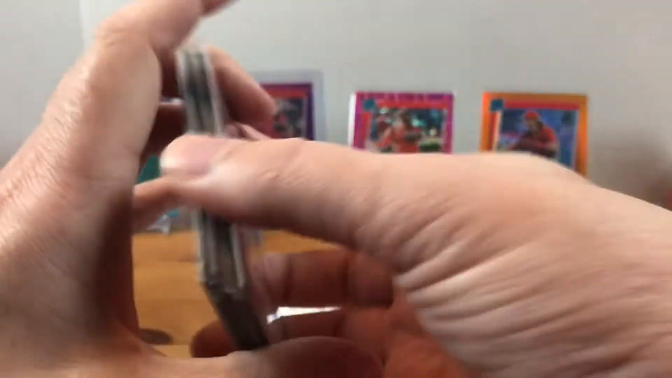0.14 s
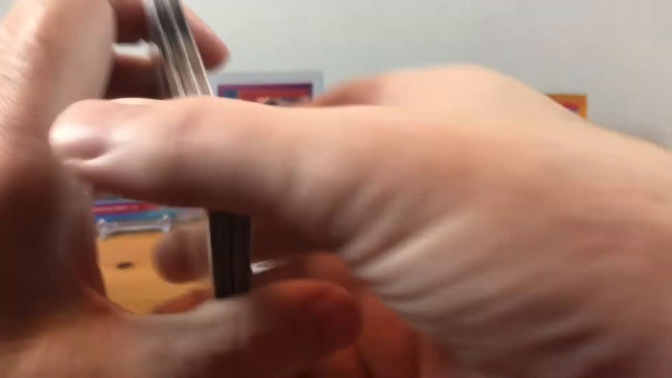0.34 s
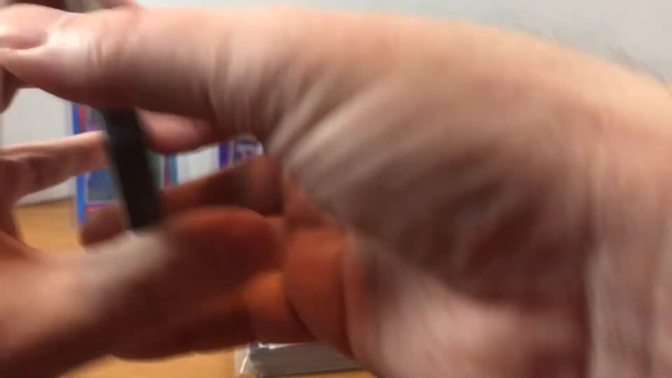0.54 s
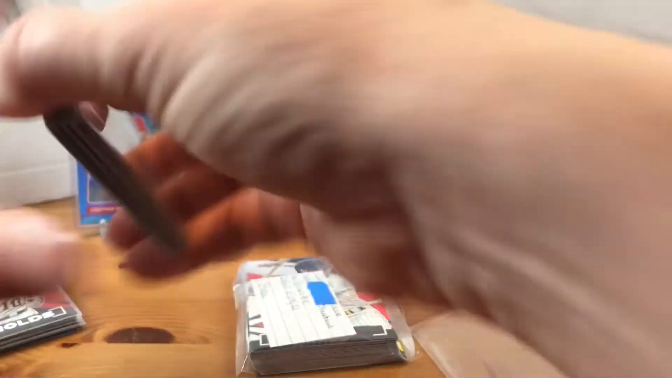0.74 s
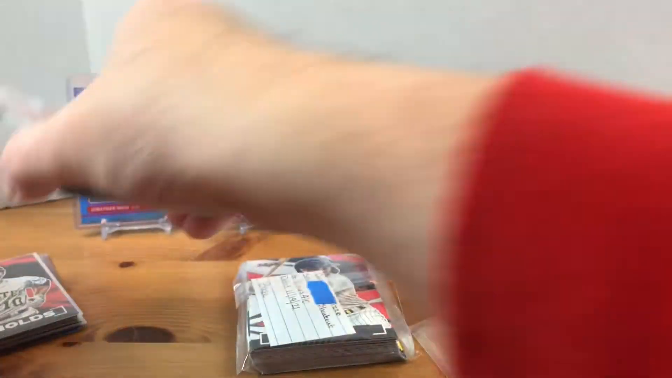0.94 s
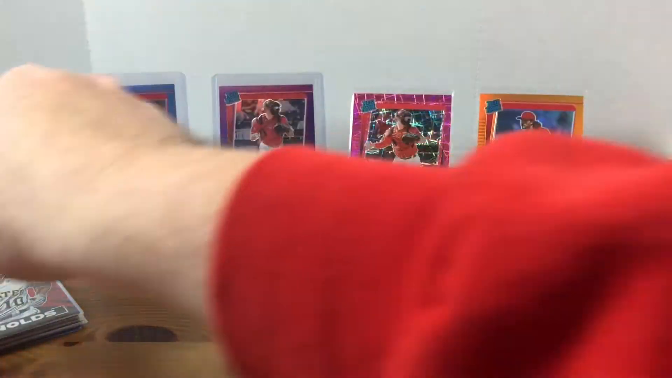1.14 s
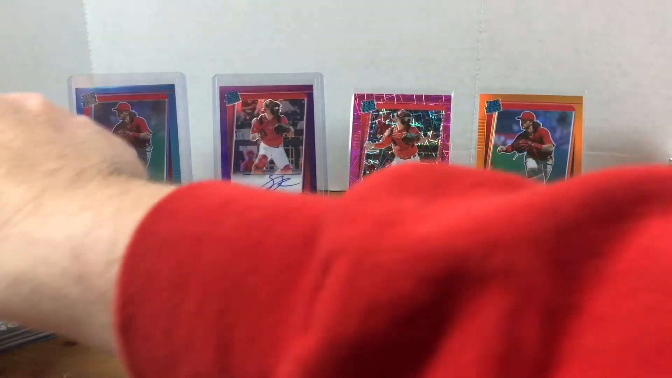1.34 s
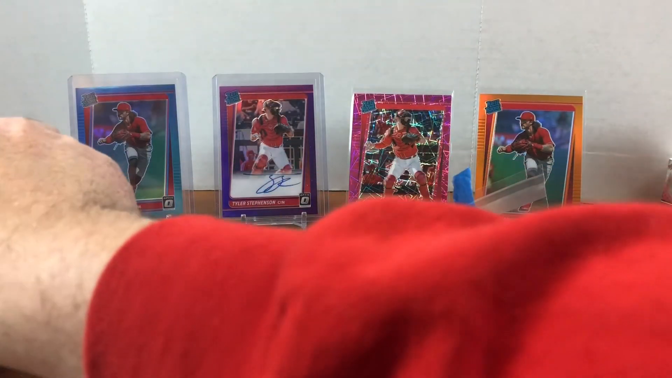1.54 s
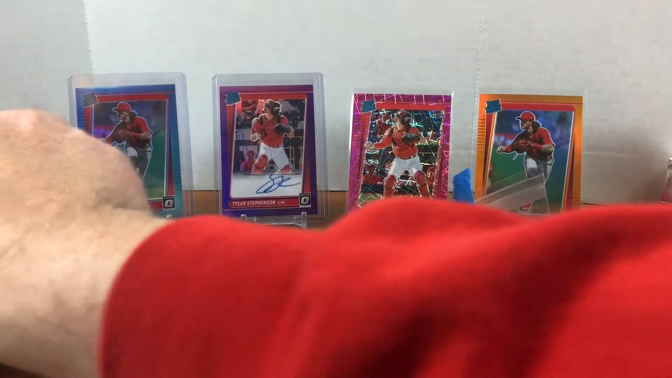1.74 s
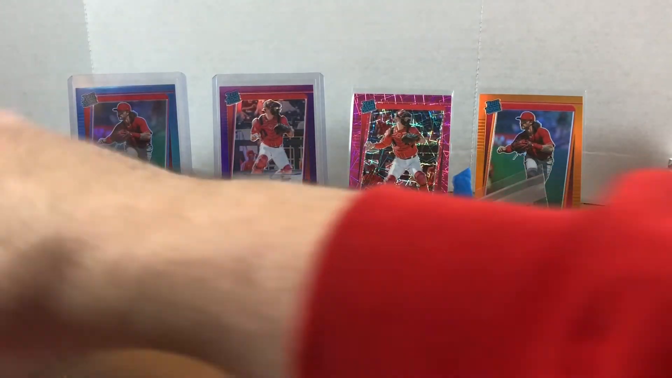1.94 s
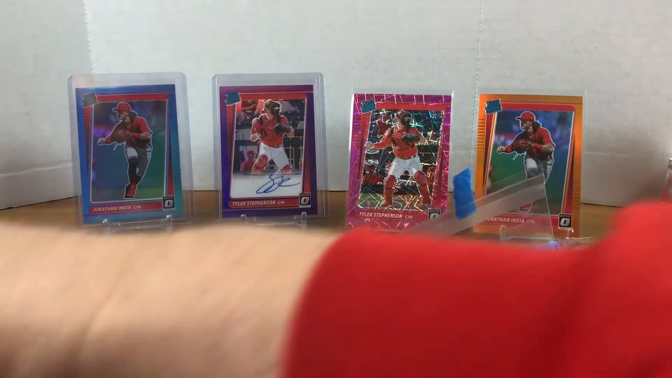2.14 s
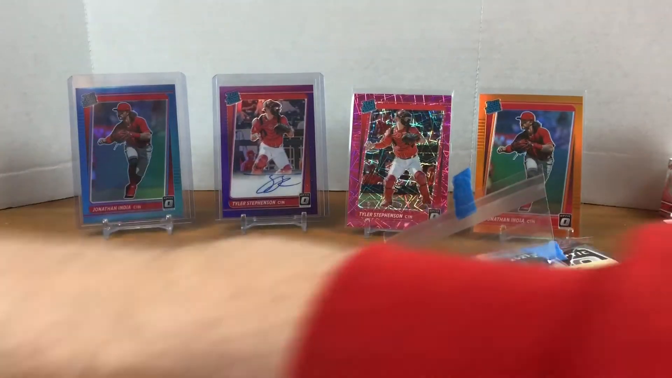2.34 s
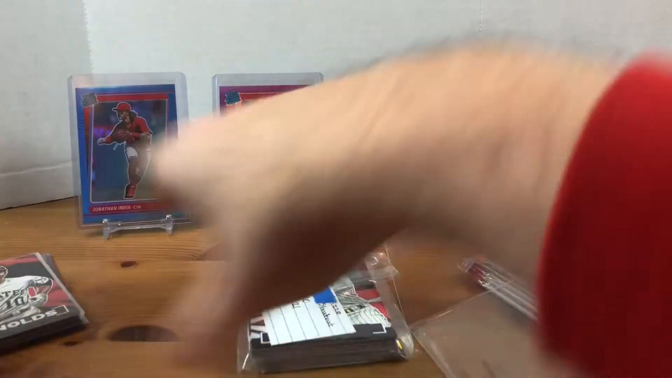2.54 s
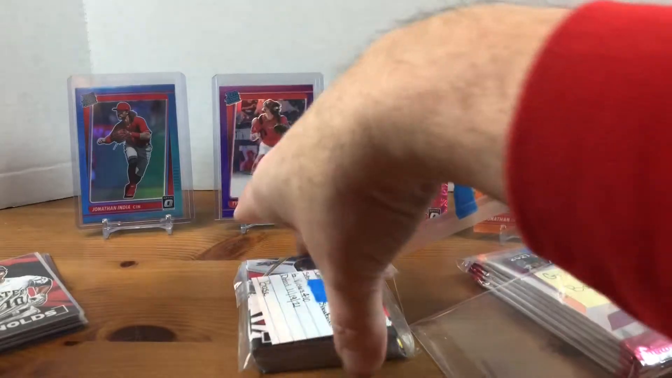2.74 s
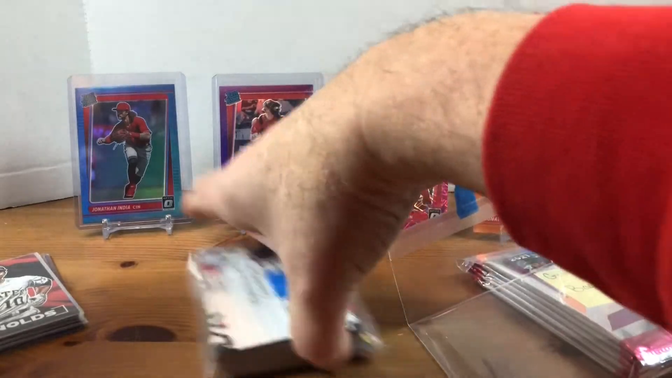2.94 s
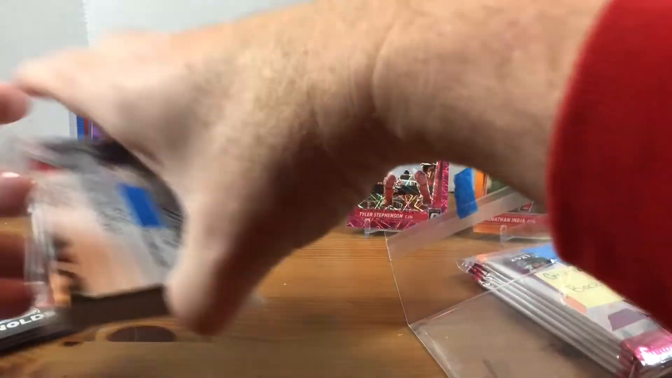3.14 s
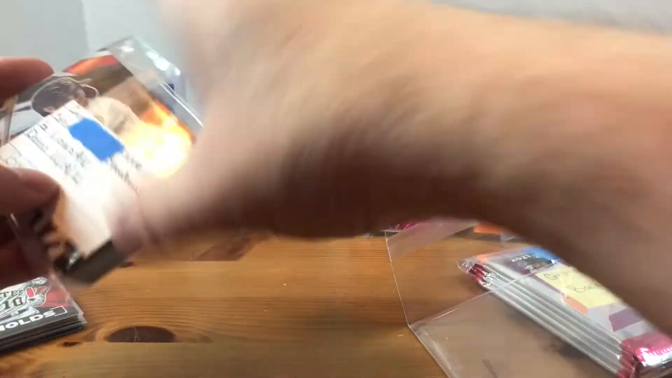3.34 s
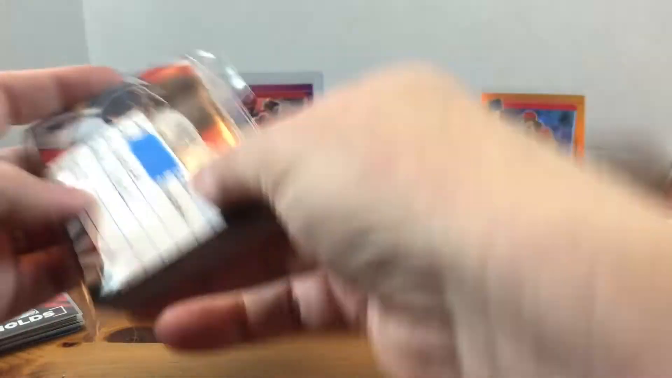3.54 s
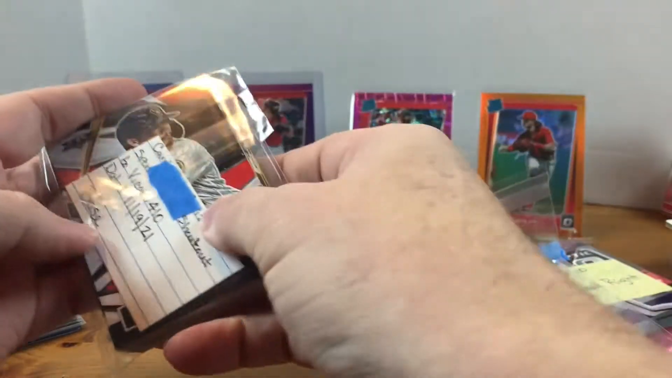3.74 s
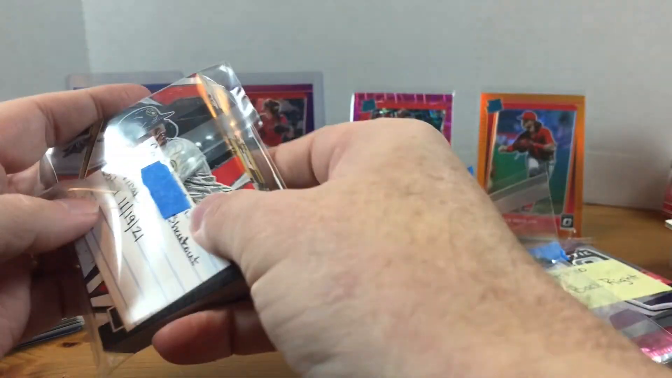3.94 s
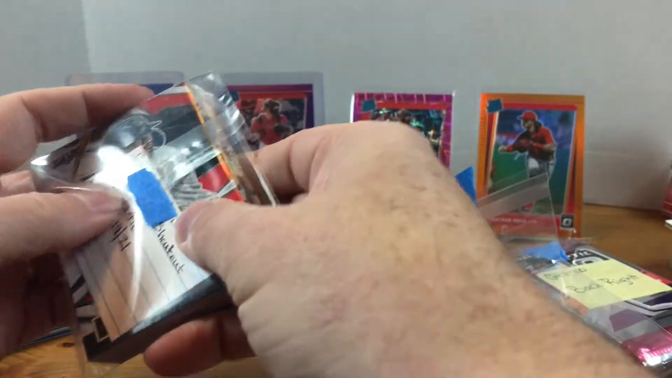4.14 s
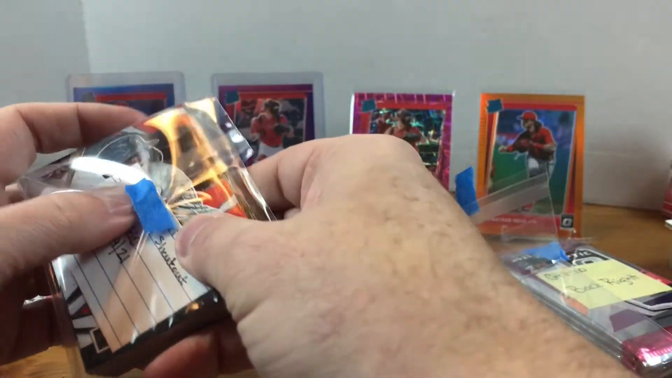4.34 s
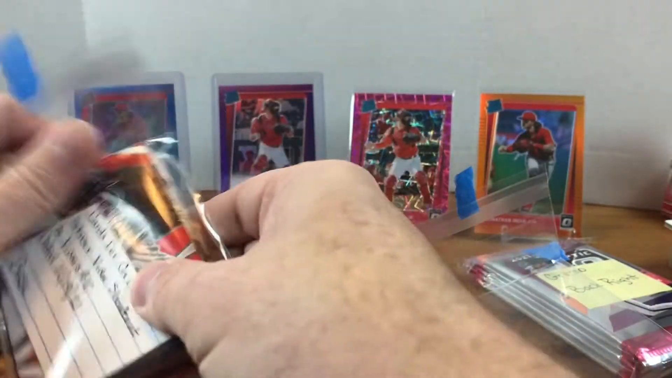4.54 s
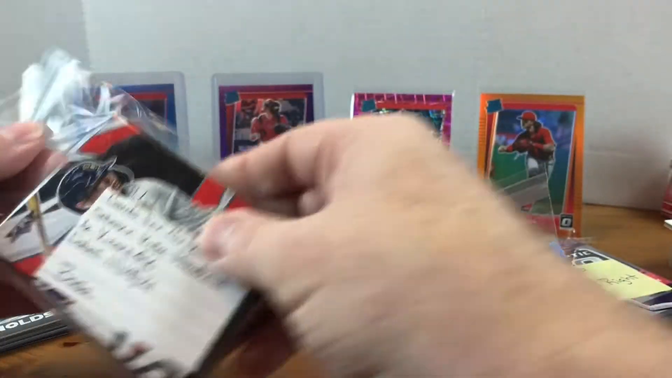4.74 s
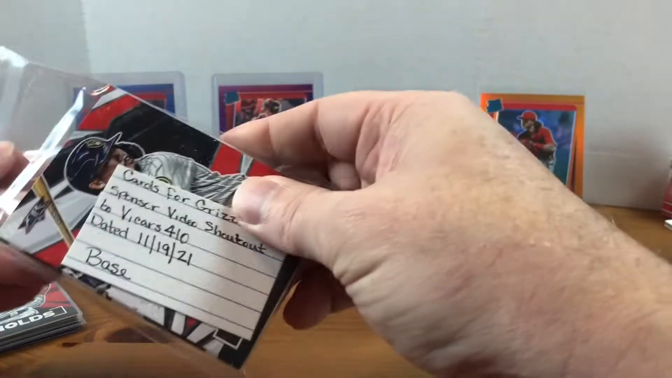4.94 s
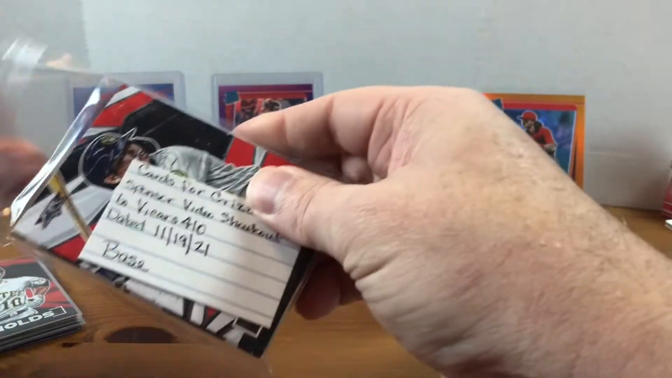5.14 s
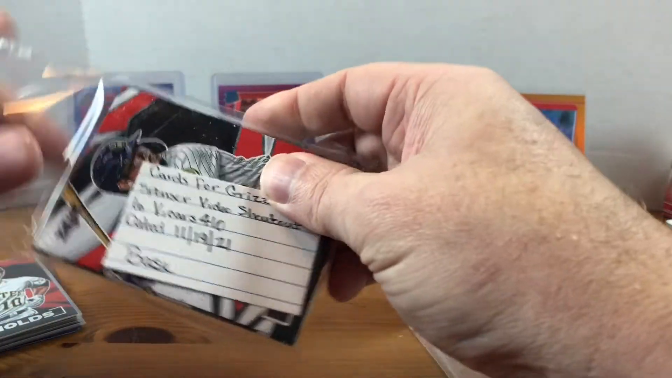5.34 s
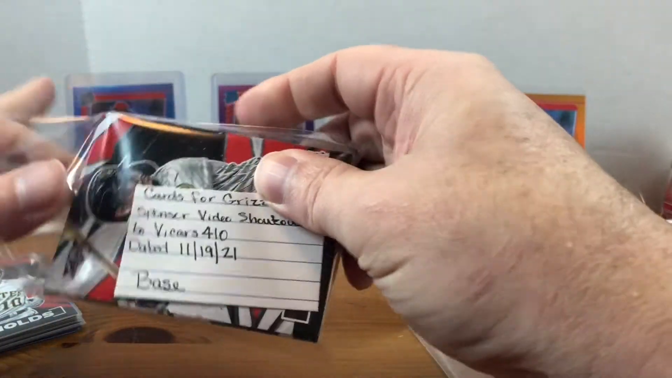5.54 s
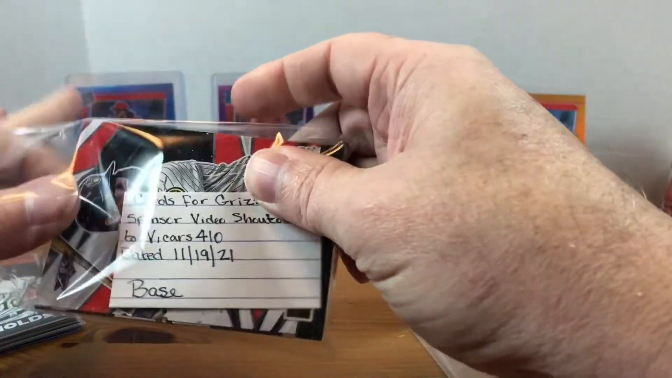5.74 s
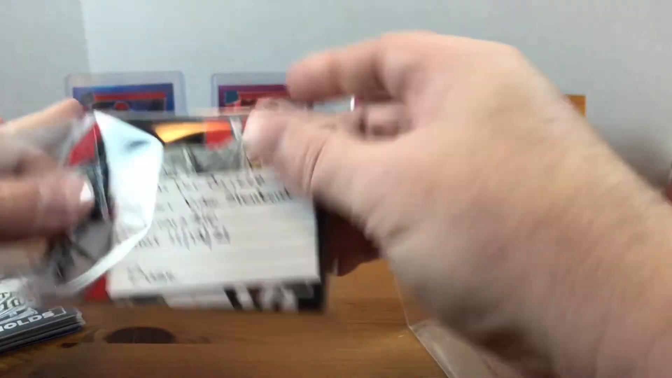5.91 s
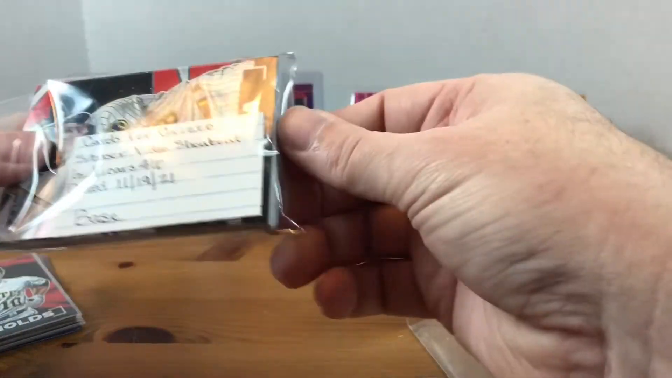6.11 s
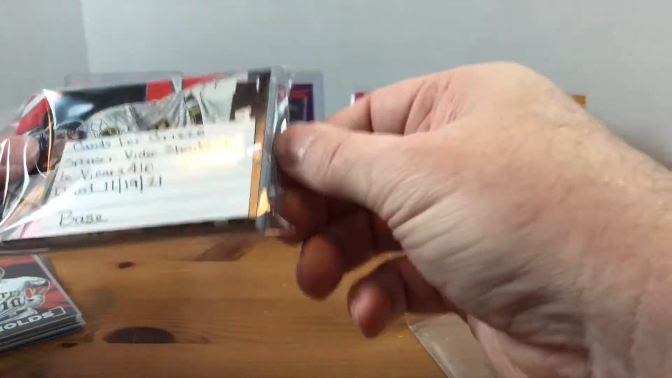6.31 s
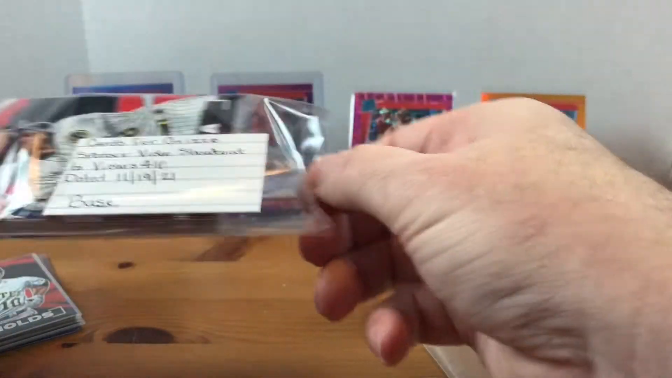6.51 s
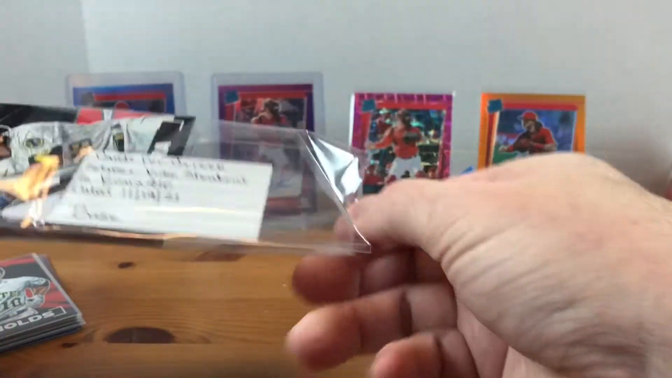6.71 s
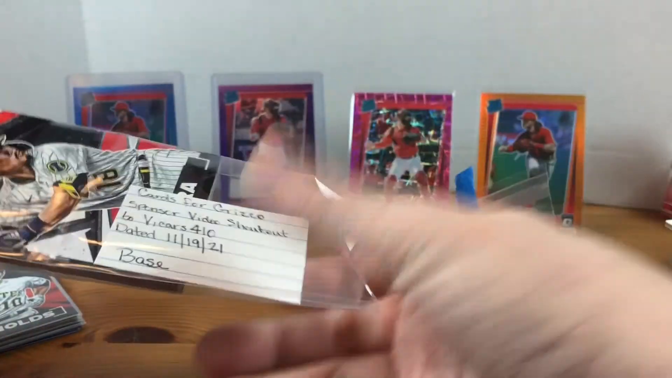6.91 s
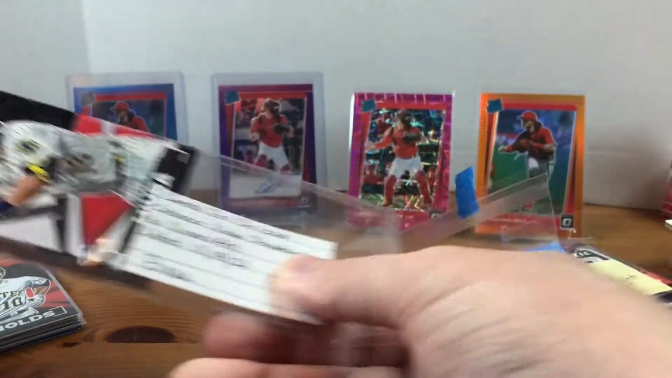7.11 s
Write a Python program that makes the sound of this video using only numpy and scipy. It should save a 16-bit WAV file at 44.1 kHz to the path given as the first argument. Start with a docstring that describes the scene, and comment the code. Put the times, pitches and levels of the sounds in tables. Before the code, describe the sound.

Quick dry card slides and light plastic ticks open the scene, followed by a gentle brushing swish and a quiet gap. One solid wooden desk knock stands out, then softer bumps and a short low scrape. Faint film rustling grows into sharp popping crinkles as a thin bag is pulled about, with dull thuds on the stack inside. Near microphone, short indoor room tail, faint steady air.

```python
"""First come crisp snaps and slides of sleeved trading cards, on a wooden desk close to the microphone, small room.
A soft, airy swish runs along the stack, it is knocked down on the desk, and a second one is dragged over the wood.
Its thin plastic bag is then pulled open and off: creases snap through one by one over a fine rustle.
Shaped random slips make the friction, short forces through filters the snaps, and desk resonances the blows.
Behind it all lie the room's short tail and its quiet air."""
import sys
import numpy as np
from scipy import signal
from scipy.fft import rfft, irfft, next_fast_len
from scipy.io import wavfile

SR = 44100
rng = np.random.default_rng(int(sys.argv[2]) if len(sys.argv) > 2 else 0)


def unload_wav(signal):
    """Save mono or channel-first audio to the path in sys.argv[1] as 16-bit WAV at rate SR, clipped to [-1, 1]."""
    wavfile.write(
        sys.argv[1],
        SR,
        np.round(np.clip(np.atleast_2d(signal).T, -1, 1) * 32767).astype(np.int16),
    )


N = 316228
TIME = np.arange(N) / SR
TAPS = 2048  # length of the filters, samples
BINS = np.fft.rfftfreq(TAPS, 1 / SR)  # Hz
EDGE_HZ = 16500  # upper band limit at the microphone


def amp(db):
    """Turns decibels into a linear gain."""
    return 10 ** (np.asarray(db) / 20)


def unit(x):
    """Scales to an rms of one."""
    return x / np.sqrt(np.mean(x ** 2) + 1e-20)


def burst(x, seconds):
    """Scales a short sound to the energy of a unit level held for so long."""
    return x * np.sqrt(seconds * SR / (np.sum(x ** 2) + 1e-20))


def read(points, hz):
    """Joins points by straight lines on a log-frequency axis."""
    f, value = np.transpose(points)
    return np.interp(np.log(hz + 1), np.log(f + 1), value)


def level(times, db):
    """A gain curve in dB over time, at -120 dB outside its span."""
    return amp(np.interp(TIME, times, db, left=-120, right=-120))


def add(mix, s, sound):
    """Lays a short sound into the mix from s seconds on."""
    part = mix[max(round(s * SR), 0):][:len(sound)]
    part += sound[:len(part)]


def causal(db):
    """The sharpest (minimum-phase) impulse response that has this spectrum."""
    log_gain = np.log(amp(np.r_[db, db[-2:0:-1]]) + 1e-5)
    return np.fft.ifft(np.exp(np.conj(signal.hilbert(log_gain)))).real


def colour(x, points):
    """Gives x a spectrum and an rms of one."""
    return unit(signal.oaconvolve(x, causal(read(points, BINS)))[:N])


def grains(per_s, spread_db, hiss):
    """Tiny slips of uneven size, at random moments, over a smooth hiss."""
    size = amp(spread_db * np.minimum(rng.exponential(1, N), 4))
    slips = size * rng.choice([-1, 1], N) * (rng.random(N) < per_s / SR)
    return unit(slips) + hiss * rng.standard_normal(N)


def stroke(start, length, attack_s, release_s):
    """Gain of one sliding movement: it speeds up, holds, and dies away as the fingers let go."""
    age = TIME - start
    return np.clip(age / attack_s, 0, 1) * np.exp(-np.maximum(age - length, 0) / release_s)


def crisp(force, evenness):
    """Evens out the spectrum of a short force, so that chance pitches stand out less."""
    z = rfft(force, 2 * len(force))
    size = abs(z) + .1 * np.mean(abs(z))
    return irfft(z / size ** np.clip(evenness, 0, 1))[:len(force)]


def bending(x, cycles, lowest_hz=120):
    """Bending waves run slower the lower they are, so the low pitches arrive later than the high ones."""
    size = next_fast_len(len(x) + SR // 2)
    lag = cycles * np.log1p(np.fft.rfftfreq(size, 1 / SR) / lowest_hz)
    return irfft(rfft(x, size) * np.exp(-2j * np.pi * lag), size)[:len(x)]


def patch(hz, below_db=13, above_db=7, peak_db=4):
    """Spectrum in dB of a patch of film: it rings at its own pitch and radiates poorly below it."""
    octaves = np.log2((BINS + 30) / hz)
    slopes = below_db * np.minimum(octaves, 0) - above_db * np.maximum(octaves, 0)
    return slopes + peak_db * np.exp(-(2 * octaves) ** 2)


# creases of a sleeve or the bag snapping through, close to the microphone:
# t/s, level/dB of the crack over 3 ms, f/Hz of the patch of film,
# push on the whole sheet/dB against that level, decay time of the crack/s
CREASE_SNAPS = [(0.0622, -38, 7500, -28, 0.0021), (0.0729, -43, 9100, -20, 0.001),
                (0.1053, -48, 8600, -1, 0.0044), (0.1579, -43.5, 6200, -15, 0.0017),
                (0.3508, -36.5, 9000, -11.5, 0.0013), (0.3565, -33.5, 4550, -18, 0.0024),
                (0.362, -36, 12500, -25, 0.00083), (0.6651, -42, 10700, -5, 0.0027),
                (1.9009, -60, 11900, -13, 0.00067), (1.9092, -60, 5900, -15, 0.0038),
                (1.9326, -59.5, 4900, -20, 0.0027), (2.0485, -62.5, 5600, -1.5, 0.0013),
                (2.8634, -40, 4600, -10, 0.0015), (3.1841, -45.5, 5550, -3, 0.0026),
                (3.2847, -47, 2000, -26.5, 0.0018), (3.5351, -44, 6500, 0.5, 0.0028),
                (3.8076, -45.5, 5000, -14, 0.00068), (4.1408, -40, 3200, -11, 0.00063),
                (4.1655, -24, 4700, -32, 0.00033), (4.1856, -36, 5900, -3, 0.00095),
                (4.1944, -24.0, 7640, -15, 0.0003), (4.2061, -14.5, 7500, -33, 0.00024),
                (4.2218, -18, 5760, -16, 0.00093), (4.3325, -33, 9300, -35, 0.0038),
                (4.3548, -15.5, 7100, -20, 0.0007), (4.3679, -12.5, 7860, -30, 0.00064),
                (4.3722, -13.5, 6200, -18, 0.00033), (4.3945, -31, 5400, -5, 0.0016),
                (4.5392, -28, 6400, -14, 0.0011), (4.5466, -32, 6700, -9, 0.0042),
                (4.5878, -40, 6200, -7, 0.0016), (4.6047, -42, 5100, -4, 0.00058),
                (4.617, -36.5, 4060, 7, 0.00068), (4.6323, -42.5, 4200, 3, 0.0019),
                (4.637, -33, 4900, -18, 0.0006), (4.651, -42.5, 2800, 2, 0.0004),
                (4.6616, -35.5, 6700, 7.5, 0.0009), (4.6714, -43, 3900, -28, 0.0004),
                (4.6737, -25.5, 2000, -16, 0.0043), (4.6871, -40, 2000, 2, 0.00051),
                (4.6893, -29, 3400, -6, 0.00093), (4.6987, -30, 4260, -29, 0.0004),
                (4.7119, -26, 3740, -17, 0.0027), (4.7207, -27, 4000, -12, 0.0014),
                (4.733, -23.5, 5600, -7, 0.0027), (4.741, -30, 4000, -26, 0.00092),
                (4.7431, -25.5, 9400, -7, 0.00034), (4.7517, -23.5, 6400, -15, 0.00026),
                (4.7536, -18.5, 11900, -5.5, 0.0042), (4.7564, -26, 6450, 1.5, 0.0028),
                (4.777, -29, 3700, -24, 0.0005), (4.7834, -30, 5100, -10, 0.0017),
                (4.7891, -25.5, 4020, -26, 0.00066), (4.794, -29, 4200, -21, 0.0011),
                (4.8242, -27.0, 4930, -32, 0.0019), (4.8454, -47, 5100, -21, 0.0013),
                (4.8783, -30.5, 6100, -0.5, 0.0021), (4.9267, -24, 3630, -35, 0.0011),
                (4.9351, -34.5, 7500, 1.5, 0.0028), (4.9435, -24, 5850, -9, 0.00079),
                (4.9542, -25.5, 11200, -4, 0.002), (5.0278, -24.5, 3900, -12, 0.0008),
                (5.0316, -28.5, 8900, 2, 0.0015), (5.1714, -42, 2100, -2, 0.00046),
                (5.1896, -33.0, 5130, -4, 0.0011), (5.2567, -25.5, 5900, -5.5, 0.0011),
                (5.291, -32.5, 2000, -0.5, 0.0037), (5.3398, -39.0, 2500, -10, 0.00083),
                (5.4115, -51, 2400, 12, 0.00085), (5.4326, -29.5, 2830, -10, 0.0027),
                (5.4579, -64, 4900, -2, 0.0014), (5.4808, -35, 7600, 5.5, 0.0034),
                (5.5059, -27.5, 5570, -14, 0.00072), (5.5131, -31.5, 3100, -15, 0.0014),
                (5.5295, -16, 6900, -3.5, 0.0026), (5.582, -25, 5400, -3.5, 0.0017),
                (5.5899, -31, 10400, -5, 0.0014), (5.6069, -16.5, 9900, -10, 0.0016),
                (5.6804, -51.5, 5640, 11, 0.0019), (5.7234, -22.5, 8150, -28, 0.00079),
                (5.7302, -30.5, 5100, -1.5, 0.0019), (5.7344, -28, 6500, -5.5, 0.002),
                (5.7482, -44, 2500, -14, 0.0016), (5.7644, -23.5, 3700, -22, 0.00045),
                (5.7699, -24, 8900, -6, 0.0016), (5.7768, -29, 6750, 1.5, 0.0014),
                (5.7911, -51, 5100, 11, 0.00074), (5.8215, -30.5, 5740, -0.5, 0.0028),
                (5.845, -29, 6800, -30, 0.0008), (5.8513, -19.5, 7200, -10.5, 0.00045),
                (5.8706, -30, 5900, -25, 0.00077), (5.8756, -25.5, 4740, -16, 0.0024),
                (5.91, -18.5, 6200, -16.5, 0.00034), (5.919, -24, 5900, -11.5, 0.0016),
                (5.935, -25.5, 8600, -20, 0.0009), (6.1395, -40, 2000, -28, 0.0019),
                (6.1846, -35.5, 6380, -2, 0.0005), (6.2703, -50, 2390, 9, 0.0027),
                (6.3506, -27.5, 3780, -11, 0.00047), (6.3974, -18, 9640, -15.5, 0.00039),
                (6.4286, -15, 4760, -7, 0.0014), (6.4748, -39, 2680, 6.5, 0.0011),
                (6.5131, -29, 4000, -23, 0.0012), (6.5898, -28, 5500, -19, 0.001),
                (6.6037, -26, 5950, -29, 0.0027), (6.6685, -34, 3280, -13, 0.0014),
                (6.7361, -27.5, 3900, -18, 0.00075), (6.7517, -31.5, 3900, -7, 0.0018),
                (6.7607, -31.5, 2120, -28, 0.0041), (6.8437, -35, 3520, -10, 0.00064),
                (6.9505, -22.0, 6500, -8.5, 0.00044), (6.9713, -13.5, 4350, -16.5, 0.0014),
                (6.9832, -28.5, 6200, 2, 0.00095), (7.1247, -17, 6850, -22, 0.00042)]
# colour of the whole sheet when pushed: f/Hz, relative level/dB per Hz
SHEET_COLOUR = [(100, -28.5), (400, -9.5), (700, -3.5), (920, 3.5), (1300, -5.5), (2000, -3), (2750, 2.5),
                (3400, -6), (8000, -24)]
# a weak shiver dying away after the snap: level against the crack, decay time
SHIVER_DB, SHIVER_S = -22, .003
# the facet beside each crease rings at a pitch scattered about FACET_HZ
FACET_HZ, FACET_OCTAVES, FACET_DB, FACET_Q = 3000, .7, 6, 5


def snaps(rows, onset_db=-26, onset_s=0.0007, jump=2.08, evenness=0.22, lag_cycles=.6,
          ring_db=0.5, ring_hz=3400, ring_width_hz=1800):
    """A crease snaps through within milliseconds, its onset swelling very briefly; film and sheet radiate it."""
    out = np.zeros(N)
    t = np.arange(-128, 512) / SR  # the snap is at zero
    chances = rng.standard_normal((len(rows), len(t)))
    for (s, db, hz, push_db, decay_s), chance in zip(rows, chances):
        onset = amp(onset_db) * np.exp(-abs(t) / onset_s)
        decay = np.exp(-abs(t) / max(decay_s, 1 / SR))
        shiver = amp(SHIVER_DB) * np.exp(-abs(t) / SHIVER_S)
        envelope = np.where(t < 0, onset, decay + shiver)
        force = crisp(chance * envelope + jump * (t == 0), evenness)
        # the free span of film differs each time
        shifted = BINS * 2 ** (.1 * chance[0])
        bag_ring = ring_db / (1 + (2 * (shifted - ring_hz) / ring_width_hz) ** 2)
        facet_hz = FACET_HZ * 2 ** (FACET_OCTAVES * chance[1])
        facet_ring = FACET_DB / (1 + (2 * FACET_Q * (BINS / facet_hz - 1)) ** 2)
        film_db = patch(hz, below_db=11.5, above_db=7.5, peak_db=-1)
        crack = unit(amp(film_db + bag_ring + facet_ring))
        push = amp(push_db) * unit(amp(read(SHEET_COLOUR, shifted)))
        power = crack ** 2 + push ** 2
        sound = signal.fftconvolve(force, causal(10 * np.log10(power)))
        add(out, s + t[0], amp(db) * burst(sound, .003 * power.mean()))
    return bending(out, lag_cycles)


# how hard the bag is handled between the rubs: t/s, relative rustle level/dB
BAG_HANDLING = [(2.92, -72), (3.13, -66), (3.2, -76), (3.42, -58), (3.63, -65), (3.861, -84), (4.01, -70),
                (4.2, -75), (4.331, -56.5), (4.82, -48.5), (4.96, -47.5), (5.24, -59.5), (5.39, -47),
                (5.761, -59.5), (6.19, -66), (6.388, -62), (6.51, -51), (6.56, -59.5), (6.86, -52.5),
                (7.17, -61)]
# small creases: highest rate, loudest level against the handling and the range below it
SMALL_PER_S, SMALL_DB, SMALL_RANGE_DB = 8.7, 7.5, 8
# their lowest pitch and its spread upwards, push on the sheet and decay time
SMALL_HZ, SMALL_OCTAVES, SMALL_PUSH_DB, SMALL_DECAY_S = 3000, 1.8, -8, .0006
# from this handling level up they come at the full rate
SMALL_BUSY_DB = -49


def small_snaps(count=300):
    """Rows for creases that give way by chance: harder handling makes them louder and more frequent."""
    s, db = np.transpose(BAG_HANDLING)
    wait, size, pitch, luck = rng.random((count, 4)).T
    times = s[0] + np.cumsum(-np.log(1 - wait)) / SMALL_PER_S
    effort_db = np.interp(times, s, db)
    snap_db = effort_db + SMALL_DB - SMALL_RANGE_DB * size
    snap_hz = SMALL_HZ * 2 ** (SMALL_OCTAVES * pitch)
    rows = np.c_[times, snap_db, snap_hz, np.full((count, 2), [SMALL_PUSH_DB, SMALL_DECAY_S])]
    happens = (times < s[-1]) & (luck < amp(effort_db - SMALL_BUSY_DB))
    return list(rows[happens])


# the film catches and lets go: level points per second, and their spread
CLUMPS_PER_S, CLUMP_DB = 130, 3.7


def clumps():
    """The rustle comes in clumps: a quick random flutter of level with an rms of one."""
    knots = np.arange(0, TIME[-1] + 1, 1 / CLUMPS_PER_S)
    return unit(amp(CLUMP_DB * np.interp(TIME, knots, rng.standard_normal(len(knots)))))


# a finger rubbing over the bag: start t/s, length/s, relative friction level/dB,
# relative sounding of the stack inside/dB against that friction
BAG_RUBS = [(2.69, 0.051, -58.5, 5.5), (2.75, 0.16, -65.5, -1.5), (3.139, 0.15, -59.5, -3),
            (3.489, 0.052, -54.5, -12), (3.766, 0.17, -57.5, -8.5), (4.007, 0.1, -60.5, -9),
            (4.131, 0.085, -48, -14), (4.358, 0.028, -36.5, -10), (4.403, 0.12, -56, -20),
            (4.519, 0.028, -47, 2.5), (4.729, 0.045, -41, -12), (4.816, 0.029, -46.5, -26),
            (4.927, 0.009, -44.5, 1.5), (5.179, 0.055, -53, 2), (5.494, 0.087, -51, -2.5),
            (5.702, 0.043, -48.5, 3.5), (5.834, 0.031, -43, -5), (6.043, 0.0062, -50, -1),
            (6.086, 0.017, -47.5, -5), (6.369, 0.16, -44, -3.5), (6.543, 0.087, -44.5, -2),
            (6.65, 0.049, -44, -11.5), (6.831, 0.06, -53.5, 1), (6.935, 0.039, -44, 6),
            (7.032, 0.23, -36, -14)]
# a rub swells over this share of its length, holds, then dies away
RUB_ATTACK_SHARE, RUB_RELEASE_S = 0.55, 0.02
# colour of the rustling film: f/Hz, relative level/dB per Hz
FILM_COLOUR = [(300, -53.5), (1200, 1), (2400, -15.5), (3700, -2), (5200, 0), (7500, -2), (10500, -4.5),
               (13000, -11.5), (16000, -24.5)]
# colour of the stack inside the bag: f/Hz, relative level/dB per Hz
STACK_COLOUR = [(30, -5), (60, -3), (110, -1.5), (200, 2), (450, -6), (720, -1.5), (1150, 1.5), (1600, -1),
                (2600, -5), (4500, -22.5), (12000, -60.5)]
WRINKLE_SPREAD_DB = 9  # unevenness of the wrinkle pops


def bag(rub_db=3.5, stack_db=1, crackle_db=-3, held_stack_db=-6, held_hz=7000):
    """Film sticks, slips and pops in tiny wrinkles, duller when merely held, and sounds through the stack."""
    held = level(*np.transpose(BAG_HANDLING))
    friction = 0
    body = amp(held_stack_db) * held
    for s, length, db, body_db in BAG_RUBS:
        rub = amp(db) * stroke(s, length, RUB_ATTACK_SHARE * length, RUB_RELEASE_S)
        friction = friction + amp(rub_db) * rub
        body = body + amp(body_db + stack_db) * rub
    slips = grains(per_s=3000, spread_db=-1.5, hiss=1.0)
    wrinkles = np.zeros(N)
    for hz in np.geomspace(1800, 12000, 8):
        pops = grains(per_s=600, spread_db=WRINKLE_SPREAD_DB, hiss=0)
        wrinkles += signal.oaconvolve(pops, causal(patch(hz, peak_db=-7.0)))[:N]
    film = unit(colour(slips, FILM_COLOUR) + amp(crackle_db) * unit(wrinkles)) * clumps()
    dull = signal.lfilter(*signal.butter(1, min(held_hz, EDGE_HZ), fs=SR), film)
    inside = colour(slips, STACK_COLOUR) * clumps()
    return friction * film + held * dull + body * inside


# resonances of the bag and the hands around it: f/Hz, width/Hz, relative boost/dB
BAG_RESONANCES = [(540, 210, 9), (942, 86, 9), (2000, 140, 9.5), (2447, 290, 5), (3470, 310, 11),
                  (13990, 8400, 7.5)]
# as the bag is flexed its resonances drift by about this much, this often
DRIFT_OCTAVES, DRIFT_PER_S = .16, 14


def cupped(x, overall_db=-2):
    """The bag and the hands around it lend the rustle their resonances, which drift as the bag is flexed."""
    hz, t, z = signal.stft(x, SR, nperseg=256)
    knots = np.arange(0, t[-1] + 1, 1 / DRIFT_PER_S)
    drift = DRIFT_OCTAVES * np.interp(t, knots, rng.standard_normal(len(knots)))
    shifted = hz[:, None] * 2 ** drift
    gain_db = sum(db / (1 + (2 * (shifted - centre) / width) ** 2) for centre, width, db in BAG_RESONANCES)
    return signal.istft(z * amp(gain_db + overall_db), SR, nperseg=256)[1][:N]


# sleeved cards sliding over each other near the microphone:
# start t/s, length/s, friction level/dB, tilt towards the treble/dB per octave
CARD_SLIDES = [(-0.01, .05, -43.5, 1), (0.11, 0.039, -47.5, 0), (0.258, 0.084, -44, 1.5),
               (0.504, 0.026, -46.5, 1.5), (0.532, 0.034, -56, 1), (0.644, 0.034, -49.5, -1),
               (1.036, 0.046, -60.5, -0.5), (2.161, 0.025, -63.5, -3.5), (2.191, 0.07, -44.5, -2)]
# colour of the sleeves before the tilt: f/Hz, relative level/dB per Hz
SLEEVE_COLOUR = [(30, -10), (55, 1), (110, -8.5), (300, -16), (620, -11), (1200, -11), (1600, -6),
                 (3300, -5.5), (4400, -6.5), (9000, -2), (13300, -4), (16000, -9.5)]
# a slide swells over, and later dies away by, these shares of its length
SLIDE_ATTACK_SHARE, SLIDE_RELEASE_SHARE = 0.37, 0.13


def cards():
    """Smooth sleeves hiss as they slide; a longer stroke starts and dies away more gently."""
    slips = grains(per_s=3300, spread_db=3, hiss=1.1)
    out = np.zeros(N)
    for s, length, db, tilt in CARD_SLIDES:
        hiss = colour(slips, [(hz, gain + tilt * np.log2(hz)) for hz, gain in SLEEVE_COLOUR])
        movement = stroke(s, length, SLIDE_ATTACK_SHARE * length, SLIDE_RELEASE_SHARE * length)
        out += amp(db) * movement * hiss
    return out


# the soft swish along the stack: t/s, relative level/dB
SWISH_LEVEL = [(0.361, -61), (0.6, -59.5), (0.8, -56), (0.91, -55), (0.98, -67), (1.2, -67.5), (1.35, -74)]
# colour of the swish: f/Hz, relative level/dB per Hz
SWISH_COLOUR = [(50, -17), (150, -3.5), (330, -15.5), (550, -8.5), (900, -17.5), (1350, -12.5), (2600, -18),
                (3500, -17), (5000, -19.5), (11800, -25), (16000, -26)]


def swish(ring_db=4, ring_hz=3900, sink_hz_per_s=1500, ring_width_hz=500):
    """A soft, airy swish of coloured random grains, with a faint ring that sinks in pitch."""
    brushing = colour(grains(per_s=6600, spread_db=3.5, hiss=0.77), SWISH_COLOUR)
    hz, t, z = signal.stft(brushing, SR, nperseg=512)
    # the sinking ring is at ring_hz at the time of the second level point
    centre = ring_hz - sink_hz_per_s * (t - SWISH_LEVEL[1][0])
    ring = ring_db / (1 + (2 * (hz[:, None] - centre) / ring_width_hz) ** 2)
    ringing = signal.istft(z * amp(ring), SR, nperseg=512)[1][:N]
    return level(*np.transpose(SWISH_LEVEL)) * ringing


# resonances of the desk top with the stack on it: f/Hz, width/Hz, relative level/dB
DESK_RESONANCES = [(118, 10, -23.5), (183, 40, -7.5), (236, 31, -2.5), (334, 60, -7), (430, 60, 1),
                   (555, 80, -2), (650, 79, -4), (880, 78, -5.5), (970, 110, -9.5), (1170, 67, -1.5),
                   (1260, 300, 0), (1370, 120, -4), (1530, 80, -13.5), (1760, 220, -16), (2260, 490, -12),
                   (2820, 150, -11.5)]


def desk(corner_hz, lowest_hz=170):
    """Impulse response of the desk to a blow; a soft blow reaches only its low modes."""
    power = sum(amp(db) ** 2 / (1 + (2 * (BINS - hz) / width) ** 2) for hz, width, db in DESK_RESONANCES)
    radiation = 1 / (1 + (lowest_hz / (BINS + 1)) ** 4)  # weak in the deep bass
    blow = 1 / (1 + (BINS / corner_hz) ** 2) ** 2
    return causal(10 * np.log10(power * radiation * blow / power.max()))


# stacks and fingers knocking the desk:
# t/s, level/dB of the desk's ring over 10 ms, hardness as the corner of the blow f/Hz
DESK_KNOCKS = [(1.188, -58.5, 400), (2.1978, -33.5, 320), (2.2498, -10.5, 2604), (2.6585, -46.5, 2490),
               (2.663, -36.5, 150), (2.709, -53, 1500), (2.77, -48, 150), (2.824, -60, 295)]
# colour of a card edge striking: f/Hz, relative level/dB per Hz
CLACK_COLOUR = [(100, -26.5), (600, -14), (1500, -16), (3000, 8), (5000, 4.5), (9000, 0.5), (16000, -16.5)]


def bumps(clack_db=-12, clack_s=0.0023, chatter_db=-9, chatter_s=0.0072, evenness=.8, lag_cycles=1.4):
    """Blows ring the desk; the cards of the stack chatter after them, and hard edges clack."""
    out = np.zeros(N)
    t = np.arange(TAPS) / SR
    chances = rng.standard_normal((len(DESK_KNOCKS), 2, TAPS))
    for (s, db, hz), (chatter_noise, clack_noise) in zip(DESK_KNOCKS, chances):
        chatter = crisp(chatter_noise * np.exp(-t / chatter_s), evenness)
        force = (t == 0) + amp(chatter_db) * chatter / np.linalg.norm(chatter)
        ring = burst(signal.fftconvolve(force, desk(hz)), .01)
        edge = crisp(clack_noise * np.exp(-t / clack_s), evenness)
        clack = burst(signal.fftconvolve(edge, causal(read(CLACK_COLOUR, BINS))), .01)
        clack_gain = amp(clack_db) * hz / (hz + 1000)  # harder blows clack more
        add(out, s, amp(db) * (ring + clack_gain * clack))
    return bending(out, lag_cycles)


# fingers and edges thudding on a stack: t/s, level/dB over 10 ms, f/Hz
STACK_THUDS = [(0.47, -54.5, 480), (2.659, -54, 2050), (2.704, -52, 1700), (2.712, -44, 1360),
               (2.717, -60, 1890), (3.542, -53.5, 150), (4.548, -39.5, 364), (4.755, -31.5, 520),
               (4.833, -43.5, 310), (4.881, -44.5, 330), (5.483, -39, 345), (6.058, -49, 910),
               (5.919, -44.5, 385), (6.412, -46, 430), (6.429, -47, 464), (6.464, -41.5, 230),
               (6.749, -46.5, 256.5), (6.972, -29, 880), (7.124, -36.5, 890)]


def thuds(lag_cycles=1.2):
    """A finger landing on a stack gives a dull, well damped note that falls in pitch."""
    out = np.zeros(N)
    for s, db, hz in STACK_THUDS:
        note = burst(causal(patch(hz, below_db=9, above_db=11, peak_db=5)), .01)
        add(out, s, amp(db) * note)
    return bending(out, lag_cycles)


# the second stack scraping over the desk: t/s, level/dB
DESK_DRAG = [(2.661, -59), (2.74, -53), (2.80, -55), (2.84, -52), (2.87, -69.5), (2.9, -50), (2.93, -76)]


def drag(corner_hz=170):
    """The stack judders over the wood and keeps the desk's low modes ringing."""
    judder = grains(per_s=60, spread_db=5.0, hiss=1.0)
    ringing = unit(signal.oaconvolve(judder, desk(corner_hz))[:N])
    return level(*np.transpose(DESK_DRAG)) * ringing


# the small room's tail: f/Hz, t60/s, relative strength/dB
ROOM_BANDS = [(150, 0.68, 1.5), (400, 0.25, 1), (1200, 0.27, -3), (3500, 0.25, 0.5), (8960, 0.23, -6.5),
              (15650, 0.14, 9)]


def room(x, wet_db=-14, near_db=-16, near_s=0.0012, rise_s=0.01):
    """Quick reflections from desk and hands, then the short tail of the room, its bands fading separately."""
    t = np.arange(SR // 2) / SR
    near, late = rng.standard_normal((2, len(t)))
    # sparse reflections, none sooner than 1.2 ms
    near = near * (rng.random(len(t)) < .1) * (t > .0012) * np.exp(-t / near_s)
    hz, age, z = signal.stft(late, SR, nperseg=256)
    bands = np.array(ROOM_BANDS)
    strength_db = read(bands[:, ::2], hz)[:, None]
    t60 = read(bands[:, :2], hz)[:, None]
    fade_db = strength_db - 60 * age / t60
    tail = signal.istft(z * amp(fade_db), SR, nperseg=256)[1][:len(t)]
    tail = tail * (1 - np.exp(-(t / rise_s) ** 2))
    echo = amp(wet_db) * tail / np.linalg.norm(tail) + amp(near_db) * near / np.linalg.norm(near)
    return x + signal.fftconvolve(x, echo)[:N]


# colour of the quiet air: f/Hz, relative level/dB per Hz
AIR_COLOUR = [(12, -45), (20, -20), (68, -8), (277, -14), (310, -10.5), (357, -15.5), (1440, -26),
              (5530, -32.5), (16000, -35.5)]


def quiet_air(air_db=-70):
    """The steady background: noise given the colour of the room's air."""
    return amp(air_db) * colour(rng.standard_normal(N), AIR_COLOUR)


def scene():
    """The handling in the room, over its quiet air."""
    film = cupped(bag()) + snaps(list(CREASE_SNAPS) + small_snaps())
    stacks = cards() + swish() + bumps() + thuds() + drag()
    return (room(film + stacks) + quiet_air())[None]


# bands that cancel at the microphone: f/Hz, width/Hz
CANCELLED_BANDS = [(292, 18), (708, 59), (1065, 47)]
NULL_LEAK = .3  # share of them that is left
LOWEST_HZ = 36.4  # the microphone sheds the bass below


def record(dry):
    """Sheds deep bass, thins bands that reflections cancel, clips peaks at full scale, then limits the band."""
    heard = signal.lfilter(*signal.butter(2, LOWEST_HZ, "high", fs=SR), dry)
    for hz, width in CANCELLED_BANDS:
        notched = signal.lfilter(*signal.iirnotch(hz, hz / width, fs=SR), heard)
        heard = NULL_LEAK * heard + (1 - NULL_LEAK) * notched
    band_limit = signal.firwin(255, EDGE_HZ, window=("kaiser", 9), fs=SR)
    return signal.oaconvolve(np.clip(heard, -1, 1), band_limit[None], "same")


dry = scene()
out = record(dry)
unload_wav(out)
```